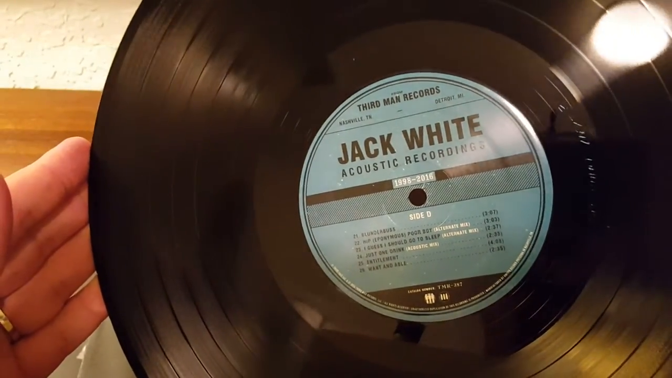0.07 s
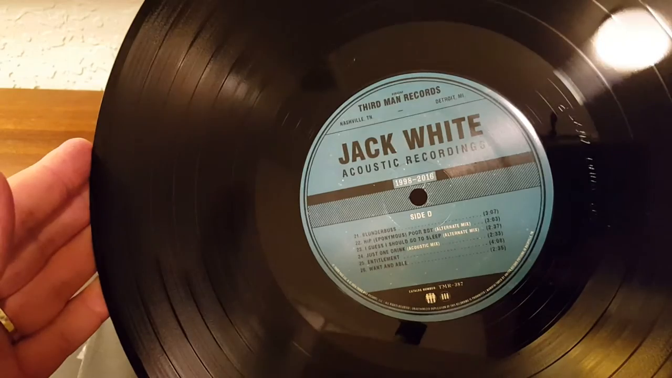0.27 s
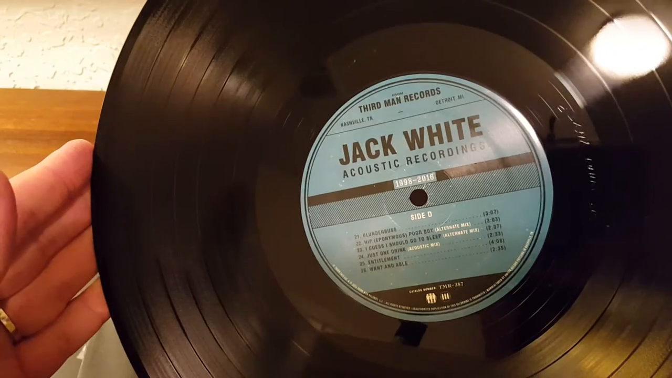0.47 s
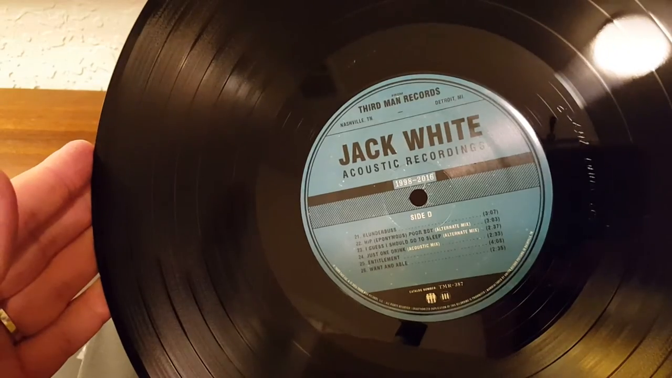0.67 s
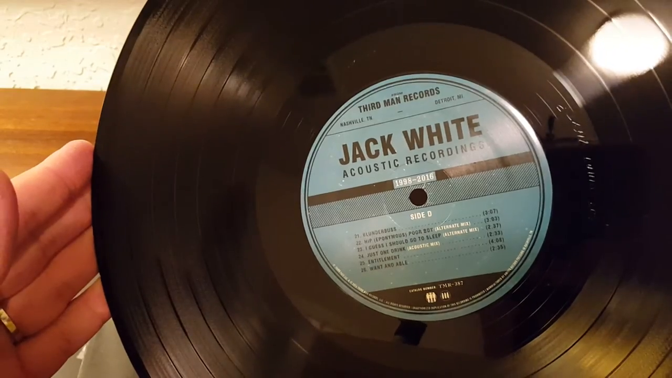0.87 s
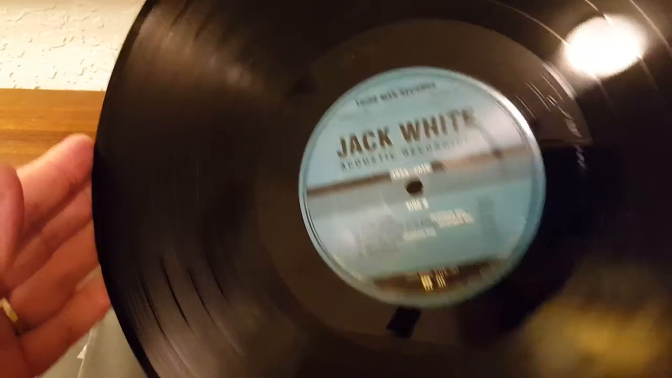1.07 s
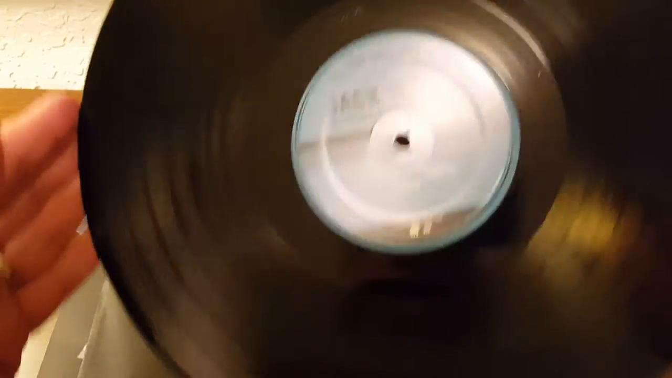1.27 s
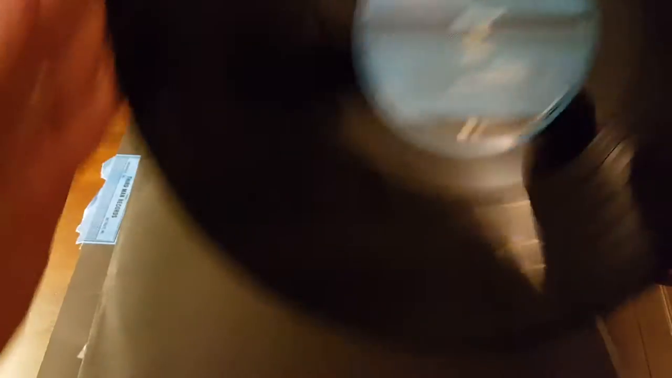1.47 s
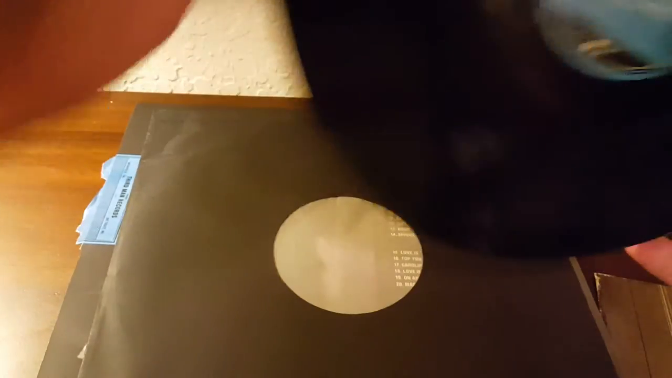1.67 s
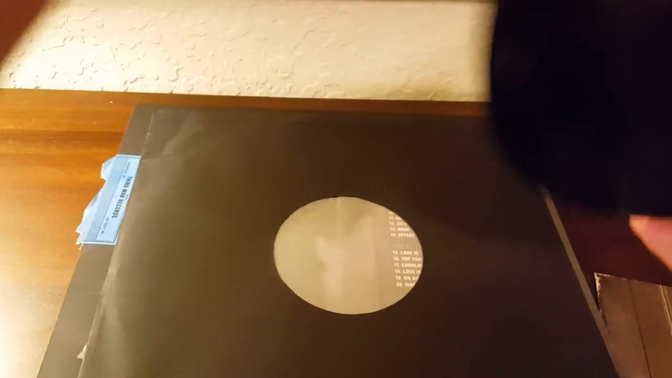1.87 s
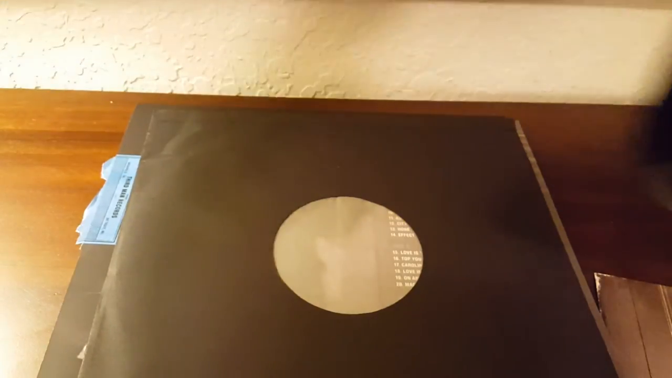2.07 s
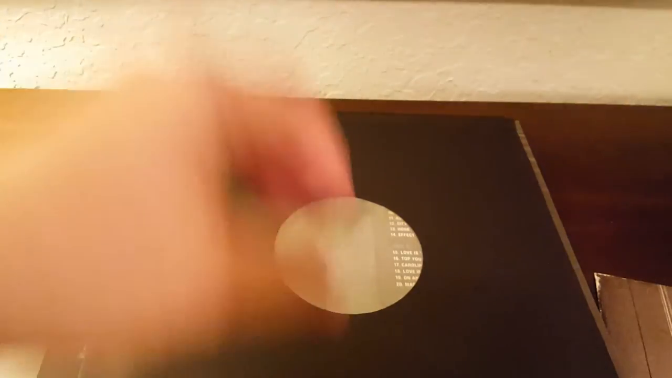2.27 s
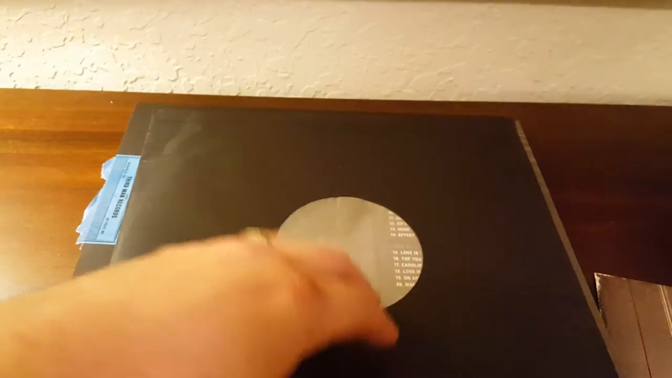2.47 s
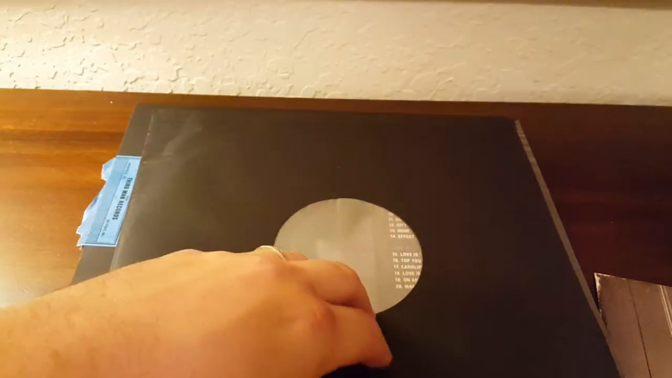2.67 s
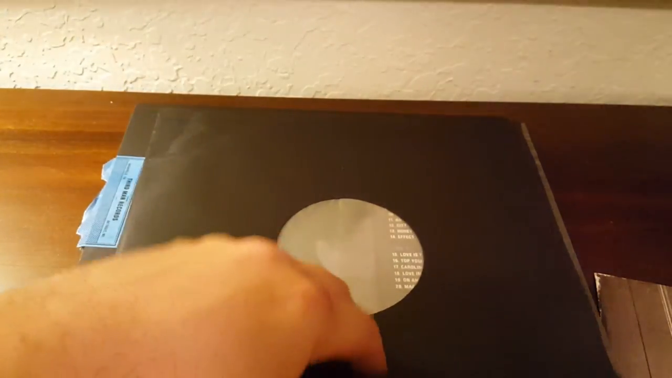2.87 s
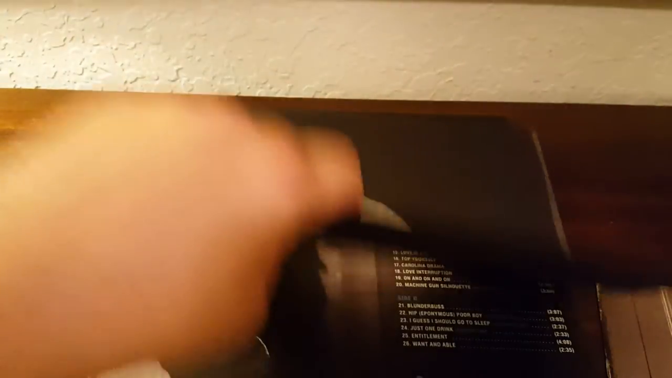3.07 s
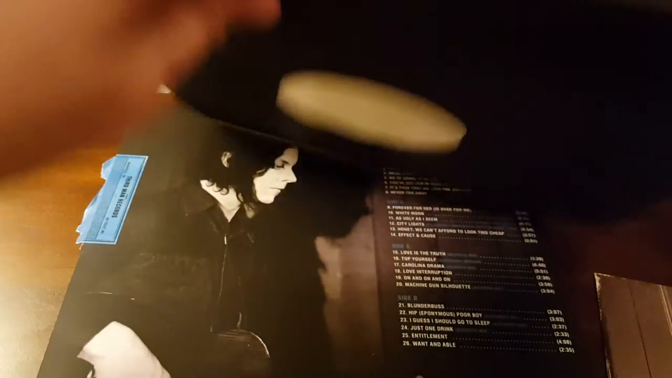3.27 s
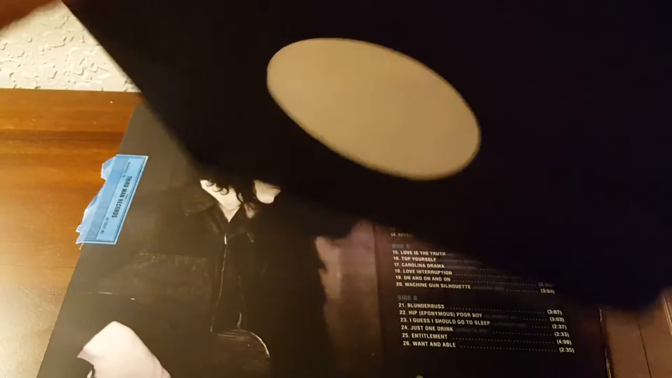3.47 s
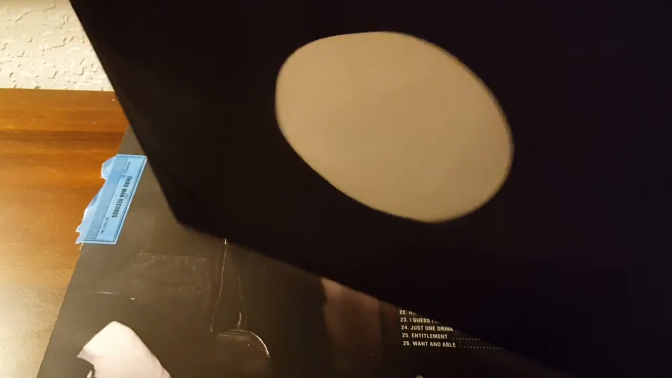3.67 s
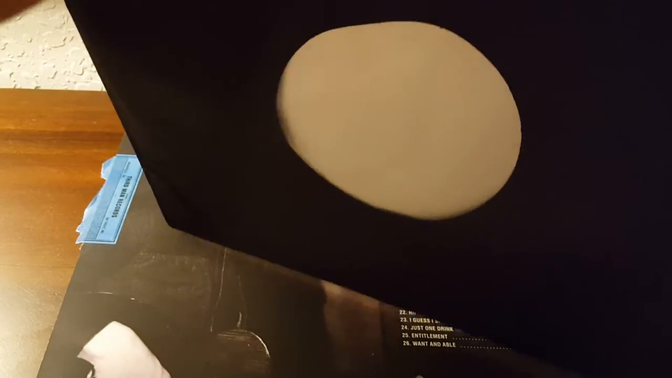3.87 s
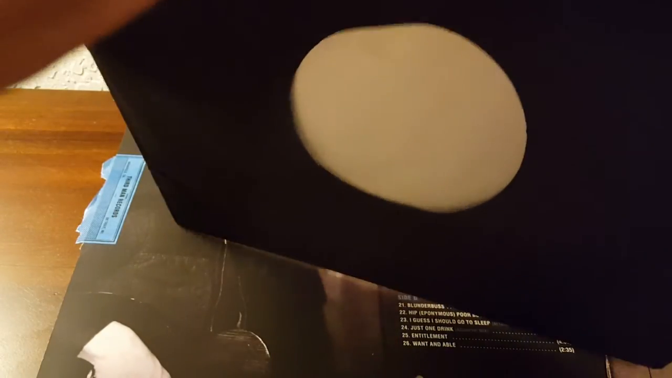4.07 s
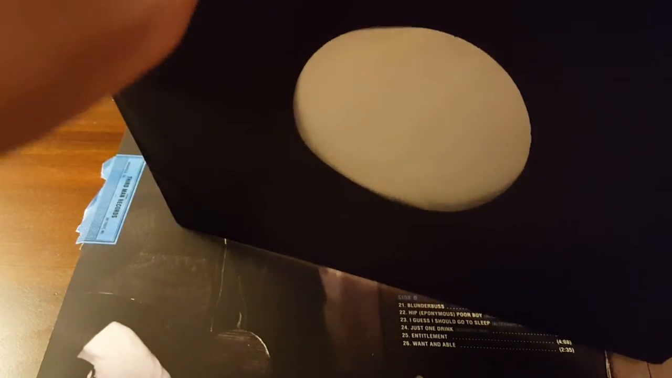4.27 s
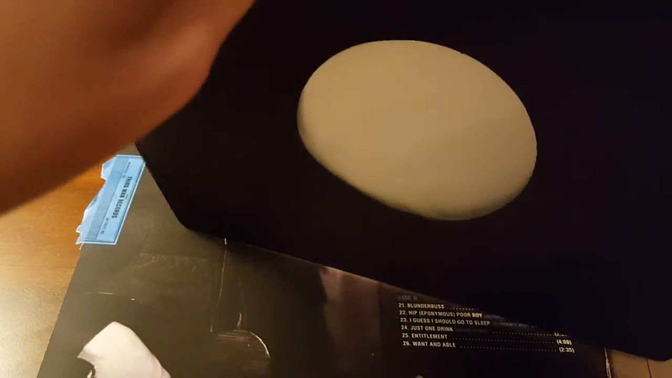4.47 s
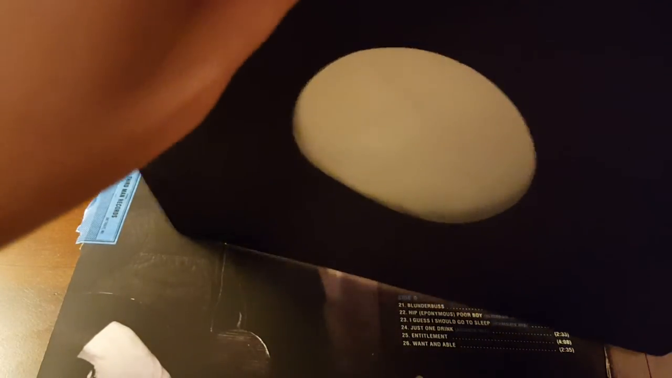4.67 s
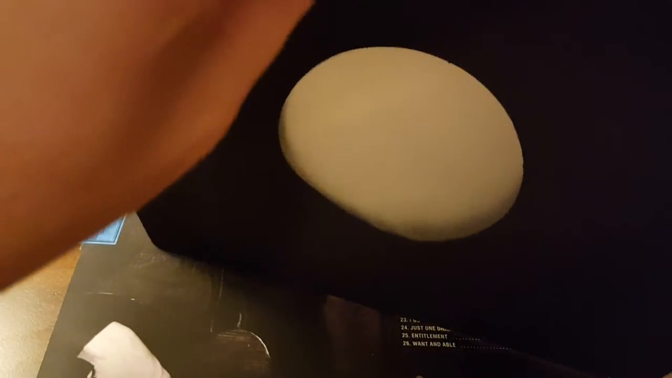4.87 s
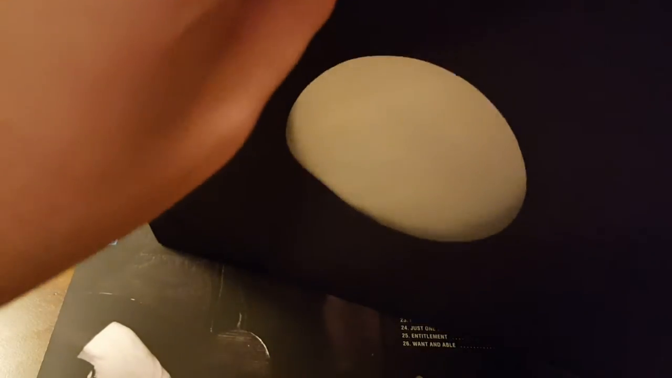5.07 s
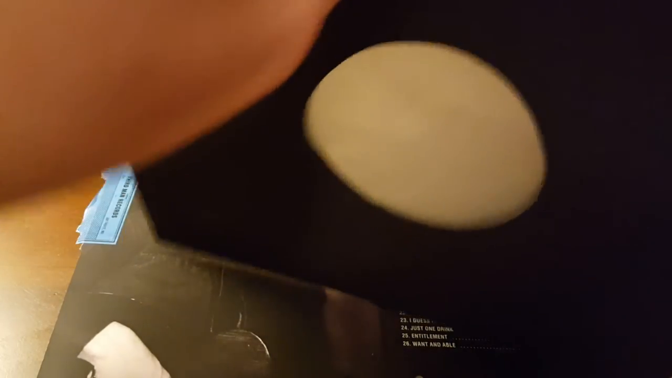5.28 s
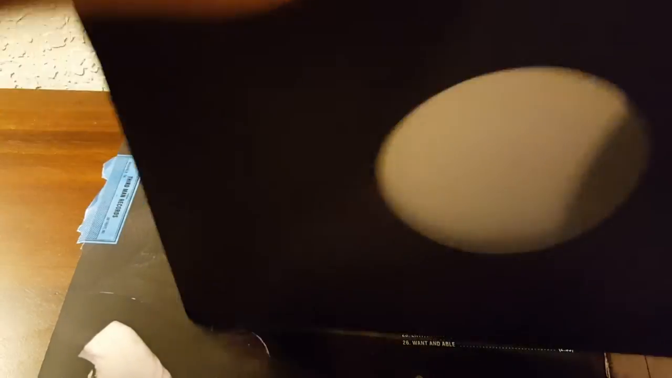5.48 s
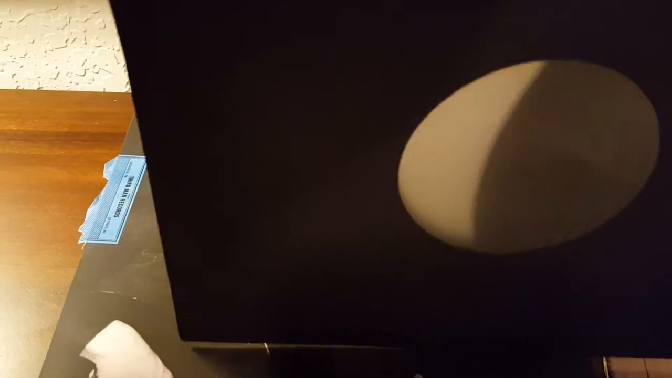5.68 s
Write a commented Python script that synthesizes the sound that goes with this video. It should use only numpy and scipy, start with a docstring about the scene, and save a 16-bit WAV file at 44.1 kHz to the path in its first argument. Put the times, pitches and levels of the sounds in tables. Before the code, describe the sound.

Fingers rub a vinyl record, it is set down with a hollow knock, then a paper sleeve slides, rustles and flaps open.

```python
"""Over the faint hum of a small room, fingers turn a vinyl record, rubbing softly on its face and rim.
It is set down with one hollow knock as the modes of a wooden top ring out. Next a paper inner sleeve is
pulled off its cardboard jacket: friction makes it rub and hiss, creases tick and a fingertip judders.
The sleeve is spread open, buckling, slapping and squeezing air from between its sheets.
At last it swishes and flaps close to the microphone."""
import sys
import numpy as np
from scipy import signal
from scipy.fft import rfft, irfft, next_fast_len
from scipy.io import wavfile
from scipy.ndimage import uniform_filter1d, map_coordinates

SR = 44100
rng = np.random.default_rng(int(sys.argv[2]) if len(sys.argv) > 2 else 0)


def inscribe(sig):
    """Save sig as 16-bit PCM at rate SR to the path in sys.argv[1].

    A 1-D sig is mono; a 2-D sig holds one channel per row.
    Samples are clipped to [-1, 1] before scaling.
    """
    pcm = np.round(np.clip(np.atleast_2d(sig).T, -1, 1) * 32767)
    wavfile.write(sys.argv[1], SR, pcm.astype(np.int16))


N = 251811

# steady hum and whine: (frequency [Hz], level [dB])
HUM_TONES = [(119, -80), (8624, -96)]
# reverberation of the room: (frequency [Hz], t60 [s])
ROOM_DECAY = [(100, 0.53), (300, 0.41), (800, 0.3), (2000, 0.18), (6000, 0.23), (15000, 0.33)]
# hands shifting on the disc: (time [s], level [dB])
GRIP_LEVELS = [(1.22, -93), (1.31, -68.5), (1.46, -67.5), (1.5, -63.5), (1.9, -65.5), (2.02, -69.5),
               (2.12, -63.5), (2.2, -79)]
# fingertips brushing its rim: (peak time [s], time to fade 20 dB [s], level [dB])
RIM_BRUSHES = [(1.375, 0.099, -71.5), (1.78, 0.06, -80), (1.91, 0.17, -78)]
# soft bumps of the disc and the bulging sheet: (time [s], relative level [dB], pitch [Hz])
PANEL_BUMPS = [(1.492, -47.5, 288), (1.587, -47, 290), (1.902, -43, 107.6), (2.57, -46.5, 122),
               (2.911, -38.5, 460), (2.992, -38.5, 264), (3.224, -38.5, 290), (3.326, -42, 224),
               (3.419, -43, 272), (3.734, -42, 225), (3.777, -45, 170), (4.069, -40.5, 236),
               (4.386, -38.5, 189), (4.688, -40, 257), (4.794, -29.5, 242.6), (5.353, -23.5, 267),
               (5.361, -21.5, 260), (5.393, -20.5, 244), (5.530, -28.5, 255), (5.579, -33, 157)]
# paper striking paper or fingers: (time [s], relative level [dB], t60 [s])
PAPER_SLAPS = [(1.694, -46, 0.05), (2.572, -46.5, 0.05), (2.783, -45, 0.044), (2.8594, -35.5, 0.051),
               (2.990, -36.5, 0.027), (3.1256, -29.5, .042), (3.451, -42, 0.031), (3.735, -35, 0.066),
               (3.742, -32.5, 0.072), (3.761, -34, 0.034), (4.1035, -35.5, 0.021), (4.386, -35.5, 0.059),
               (4.835, -36, .028), (4.904, -35, 0.14), (5.061, -41.5, 0.04), (5.363, -20, 0.026),
               (5.393, -21.5, 0.03), (5.457, -29.5, 0.034)]
# the disc touching down and settling: (time [s], relative level [dB])
DISC_CONTACTS = [(2.145, -29.5), (2.1492, -19), (2.168, -31), (2.1853, -29)]
# modes of the wooden top: (frequency [Hz], relative level [dB], t60 [s])
WOOD_MODES = [(86.7, -33, 0.6), (156.5, -12.5, 0.15), (212, -10.5, 0.16), (256.3, -12, 0.2),
              (288.3, -8.5, 0.18), (364, -18, 0.21), (440, -8, 0.17), (480.6, -3, 0.07),
              (521.4, -2.5, 0.085), (542.6, -6.5, 0.18), (663, -27, 0.25), (755, -12.5, 0.14),
              (976, -28.5, 0.2), (1100, -28, 0.15), (1145, -23.5, 0.16)]
# creases flipping over: (time [s], relative level [dB])
CREASE_SNAPS = [(2.5417, -54), (2.661, -49.5), (2.711, -52), (3.1734, -33.5), (3.8138, -49),
                (4.1045, -45.5), (4.124, -46), (4.364, -40.5), (4.4037, -39.5), (4.4787, -47.5),
                (4.641, -48), (4.772, -52), (4.8357, -42.5), (5.3937, -32), (5.4097, -41), (5.567, -27.5)]
# even pulls over the jacket: (start [s], length [s], rub level [dB], hiss over rub [dB])
SLEEVE_PULLS = [(2.556, 0.024, -64, 4), (2.713, 0.22, -69, 1), (2.862, 0.11, -56, 2.5),
                (2.983, 0.088, -51.5, 0.5), (3.072, 0.065, -54, -13), (3.125, 0.1, -46.5, -0.5),
                (3.235, 0.067, -50.5, -8.5), (3.34, 0.084, -68, 2), (3.531, 0.048, -64, -1)]
# air squeezed from between the sheets:
# (peak time [s], time to fade 20 dB [s], level [dB], resonance [Hz], glide [octaves/s], width [Hz])
AIR_PUFFS = [(3.19, 0.12, -46, 3386, -7.5, 1203), (3.746, 0.028, -43, 1452, -6, 370),
             (4.92, .045, -45, 1310, 2, 370), (4.943, 0.049, -42.5, 3600, 2, 990),
             (5.306, 0.048, -46, 2246, 17.5, 300), (5.334, 0.018, -41.5, 3320, 12.5, 370)]
# sheet scraping on sheet: (peak time [s], time to fade 20 dB [s], rub level [dB], hiss over rub [dB])
SHEET_SCRAPES = [(3.75, 0.05, -44, -12.5), (3.877, .1, -52, -13.5), (4.033, 0.13, -53, -12.5),
                 (4.128, 0.06, -55, -9), (4.185, .055, -49.5, -19), (4.246, 0.04, -59.5, -6),
                 (4.334, 0.03, -60.5, -9.5), (4.419, 0.06, -39.5, -12.5), (4.503, 0.13, -59, -13),
                 (4.569, .05, -50.5, -21), (4.666, 0.08, -53, -12), (4.737, 0.08, -48, -14),
                 (4.79, 0.1, -53, -21), (4.937, 0.0474, -31.5, -12.5), (5.088, 0.075, -48, -10),
                 (5.194, 0.15, -54, -12)]
# the open sleeve swinging past: (time [s], rub level [dB], hiss level [dB], flutter level [dB])
SWING_LEVELS = [(5.25, -79, -81.5, -92), (5.3, -52.5, -48.5, -62), (5.36, -44, -54.5, -38),
                (5.46, -48, -48.5, -46.5), (5.54, -52.5, -55, -50), (5.63, -62, -51.5, -57),
                (5.71, -57, -51, -55.5)]
# where the sleeve is: (time [s], left over right [dB], delay of the left channel [ms])
SLEEVE_PATH = [(2.5, -2, -0.086), (3.2, 0, 0.0039), (3.73, -1, 0.19), (5.4, -2.5, 0.2)]

# noise spectra: (frequency [Hz], relative spectral density [dB])
AIR_SPECTRUM = [(20, -7), (45, -8), (70, -11), (120, -3.5), (190, -14.5), (300, -13.5), (600, -17),
                (1200, -17), (2400, -24.5), (4500, -29.5), (8000, -35.5), (12000, -35), (15800, -34.5)]  # room air
SKIN_SPECTRUM = [(47, -28), (80, -1), (148, -8), (285, -1), (339, -5), (655, -13), (950, -18), (1110, -17),
                 (15000, -47.5)]  # skin on the disc
CRISP_SPECTRUM = [(300, -39.5), (1500, -1.5), (3500, -2.5), (7000, -3), (12000, -2), (16000, -5)]  # creases and rim brushes
SLAP_SPECTRUM = [(100, -1.5), (400, -5.5), (750, 8), (1050, -5.5), (1400, 4.5), (2200, -5), (4500, -10),
                 (9000, -22.5), (16000, -35.5)]  # clapping paper
THUD_SPECTRUM = [(30, -65), (70, -45), (130, -5.5), (260, -9), (520, -5), (750, -6.5), (1100, -12.5),
                 (1400, -19), (2300, -21), (3600, -32.5), (6000, -41.5), (16000, -61)]  # dense modes of the wood
CARD_SPECTRUM = [(150, -33), (400, -10), (650, -4), (1000, 0.5), (1800, 1.5), (2600, 3.5), (3500, -3),
                 (4600, -5), (8000, -25), (16000, -35)]  # paper on cardboard
HISS_SPECTRUM = [(1500, -19), (3500, -4.5), (6000, -3.5), (8500, -2.5), (10500, -7.5), (13000, -6),
                 (16000, -11)]  # fine sliding hiss
FLUTTER_SPECTRUM = [(25, -32), (60, -5), (100, 0), (200, -1.5), (270, 2), (345, -9.5), (445, -0.5),
                    (550, -9), (690, -3.5), (900, -11), (1500, -8), (5000, -58)]  # the buckling sheet
PAPER_SPECTRUM = [(150, -26), (540, -10.5), (690, 6), (1050, -1), (1500, 3.5), (2400, 4.5), (3600, -2.5),
                  (4600, -9), (8000, -15.5), (16000, -54)]  # paper on paper

HELD_FROM_S, HELD_TO_S = 3.3, 5.3  # the sleeve is held in the air


def amp(db):
    """Amplitude ratio of a level in decibels."""
    return 10 ** (np.asarray(db) / 20)


def unit(x):
    """Normalisation to an rms of 1."""
    return x / np.sqrt(np.mean(x ** 2) + 1e-20)


def clock():
    """Time of every sample, in seconds."""
    return np.arange(N) / SR


def along(points, hz):
    """Interpolation of (frequency, value) points on a logarithmic frequency axis."""
    freqs, values = np.transpose(points)
    return np.interp(np.log(hz + 1), np.log(freqs), values)


def curves(rows):
    """Linear interpolation in time: one curve for each column after the first."""
    times, *columns = np.transpose(rows)
    return [np.interp(clock(), times, column) for column in columns]


def add(track, start, sound):
    """Superposition: a sound adds to the track from its start time on."""
    part = track[..., round(start * SR):][..., :sound.shape[-1]]
    part += sound[..., :part.shape[-1]]


def decay(t, t60):
    """Exponential damping: the level falls 60 dB in t60 seconds."""
    return np.exp(-np.log(1000) * t / t60)


def during(start, end):
    """A rectangular gate, smoothed at its edges."""
    return uniform_filter1d(1.0 * ((clock() >= start) & (clock() <= end)), size=600)


def swell(peak, fade, rise_ratio=0.55, rounding=0.97):
    """Envelope of a stroke that speeds up and slows down; rounding 1 is pointed, 2 a bell."""
    t = clock() - peak
    return amp(-20 * (np.maximum(t, -t / rise_ratio) / fade) ** rounding)


def even_pull(start, length, attack_s=0.024, release_db_per_s=420):
    """Envelope of steady sliding: linear attack, plateau, exponential release."""
    t = clock() - start
    return np.clip(t / attack_s, 0, 1) * amp(-release_db_per_s * np.maximum(t - length, 0))


def wobble(rate):
    """Low-pass noise: a smooth curve through `rate` random knots a second."""
    knots = rng.standard_normal(int(N * rate / SR) + 4)
    return unit(map_coordinates(knots, [clock() * rate]))


def narrowband(hz, width):
    """Noise in one resonance: a carrier with randomly modulated quadrature parts."""
    phase = 2 * np.pi * np.cumsum(hz) / SR
    return unit(wobble(width) * np.sin(phase) + wobble(width) * np.cos(phase))


def stereo_noise(shared, size=N):
    """Partial coherence: white noise with a share of its power common to both channels."""
    common = np.sqrt(shared) * rng.standard_normal(size)
    return common + np.sqrt(1 - shared) * rng.standard_normal((2, size))


def diffuse(size, apart_hz):
    """A diffuse field: long waves reach both channels alike, those above apart_hz independently."""
    mid, side = rfft(rng.standard_normal((2, size)))
    angle = np.clip(np.fft.rfftfreq(size, 1 / SR) / apart_hz, 0, 1) * np.pi / 4
    return irfft(np.cos(angle) * mid + np.array([[1], [-1]]) * np.sin(angle) * side, size)


def burst(t60, shared):
    """A transient of exponentially damped stereo noise."""
    t = np.arange(SR // 3) / SR
    return stereo_noise(shared, size=len(t)) * decay(t, t60)


def stick_slip(rate, spread_db, shared):
    """Stick-slip as shot noise: tiny uneven impulses, on average `rate` a second."""
    catches = rng.random(N) < rate / SR
    impulses = stereo_noise(shared) * catches
    return unit(impulses * amp(spread_db * np.minimum(rng.exponential(size=N), 4)))


def coloured(x, spectrum, size=4096):
    """Minimum-phase filtering: a causal response of unit energy imposes the spectrum."""
    magnitude = amp(along(spectrum, np.fft.rfftfreq(size, 1 / SR)))
    cepstrum = irfft(np.log(magnitude))
    causal_fold = np.r_[1, np.full(size // 2 - 1, 2), np.zeros(size // 2)]
    response = irfft(np.exp(rfft(cepstrum * causal_fold)))
    return signal.fftconvolve(x, np.atleast_2d(response / np.linalg.norm(response)), axes=1)[:, :N]


def background():
    """Ambient noise: a diffuse field of room air under a hum and a thin electrical whine."""
    tones = sum(amp(db) * np.sqrt(2) * np.sin(2 * np.pi * hz * clock() + 0.5 * wobble(15))
                for hz, db in HUM_TONES)
    air = unit(coloured(diffuse(size=N, apart_hz=810), AIR_SPECTRUM))
    return amp(-66) * air + tones


def hands():
    """Skin friction: a dull rub on the face of the disc and a bright brushing on its rim."""
    level_db, = curves(GRIP_LEVELS)
    grip = during(GRIP_LEVELS[0][0], GRIP_LEVELS[-1][0]) * amp(level_db + 2.3 * wobble(22.07))
    skin = unit(coloured(stick_slip(rate=1000, spread_db=1.1, shared=0.79), SKIN_SPECTRUM))
    brush = unit(coloured(stereo_noise(shared=0.087), CRISP_SPECTRUM))
    rim_strokes = sum(amp(db) * swell(peak, fade) for peak, fade, db in RIM_BRUSHES)
    return grip * skin + (amp(-15.5) * grip + rim_strokes) * brush


def bumps(rise_cycles=0.6):
    """Panel radiation: the disc or a buckling sheet pushes the air in two heavily damped modes."""
    out, t = np.zeros((2, N)), np.arange(SR // 8) / SR
    for start, db, hz in PANEL_BUMPS:
        push = t * hz / rise_cycles
        upper_hz = hz * rng.uniform(1.2, 2.56)
        panel = np.sin(2 * np.pi * hz * t) + 0.43 * np.sin(2 * np.pi * upper_hz * t)
        add(out, start, amp(db - 6) * push * np.exp(1 - push) * panel)
    return out


def slaps(contact_s=0.00079):
    """Impact noise: the loose sheet claps on paper or fingers; finite contact time softens the onset."""
    out = np.zeros((2, N))
    for start, db, t60 in PAPER_SLAPS:
        clap = burst(t60, shared=0.49)
        onset = 1 - np.exp(-np.arange(clap.shape[1]) / SR / contact_s)
        add(out, start, amp(db - 5.5) * clap * onset)
    return coloured(out, SLAP_SPECTRUM)


def knock():
    """Modal vibration: struck by the disc, a wooden top rings in its low modes over a dense thud."""
    t = np.arange(SR // 2) / SR
    ring = sum(amp(db) * np.sin(2 * np.pi * hz * t) * decay(t, t60) for hz, db, t60 in WOOD_MODES)
    # the soft edge takes a moment to load the wood
    ring *= 1 - np.exp(-(t / 0.0007) ** 2)
    # a small top radiates no deep bass
    ring = signal.sosfilt(signal.butter(4, 72, "highpass", fs=SR, output="sos"), ring)
    # the dense upper modes build up as the blow spreads through the wood
    build = (1 - np.exp(-t / 0.008)) * decay(t, t60=0.3)
    top, thud = np.zeros((2, N)), np.zeros((2, N))
    for start, db in DISC_CONTACTS:
        add(top, start, amp(db) * ring)
        add(thud, start, amp(db - 19.5) * build * diffuse(size=len(t), apart_hz=600))
    return top + coloured(thud, THUD_SPECTRUM)


def snaps(ticks_per_s=12):
    """Snap-through buckling: creases flip with a dry tick, faint ones at random in the held sleeve."""
    out = np.zeros((2, N))
    count = int(ticks_per_s * (HELD_TO_S - HELD_FROM_S))
    faint = [(rng.uniform(HELD_FROM_S, HELD_TO_S), rng.normal(-55.5, 2.1)) for _ in range(count)]
    for start, db in CREASE_SNAPS + faint:
        add(out, start, amp(db - 3.5) * burst(t60=0.012, shared=0.35))
    return coloured(out, CRISP_SPECTRUM)


def shifting_resonances(x, depth_db):
    """Time-varying filtering: resonances come and go at random as a sheet changes shape."""
    spectra = signal.stft(x, nperseg=512)[2]
    patches = uniform_filter1d(rng.standard_normal(spectra.shape[1:]), size=5, axis=0)
    patches = uniform_filter1d(patches, size=7, axis=1)
    return unit(signal.istft(spectra * amp(depth_db * unit(patches)), nperseg=512)[1][:, :N])


def sliding(rub_gain, hiss_gain, surface, rate, spread_db, shared):
    """Sliding friction: paper fibres catch and let go, giving a grainy rub and a finer hiss."""
    grip_db = 1.35 * wobble(60)  # the contact catches and eases
    rub = coloured(stick_slip(rate, spread_db, shared), surface)
    rub = shifting_resonances(rub, depth_db=2.2)
    hiss = coloured(stick_slip(2 * rate, spread_db, shared / 2), HISS_SPECTRUM)
    hiss = shifting_resonances(hiss, depth_db=1.5)
    return amp(grip_db) * (rub_gain * rub + hiss_gain * hiss)


def flutter_gain(rub_gain, flutter_db, pivot_db=-50):
    """A power law: flutter grows with the rub, reaching flutter_db at a rub of pivot_db."""
    return amp(flutter_db) * (rub_gain / amp(pivot_db)) ** 0.45


def flutter(gain):
    """Local buckling: many small impulses merge into the low flutter of the sheet."""
    return gain * unit(coloured(stick_slip(rate=900, spread_db=1.5, shared=0.91), FLUTTER_SPECTRUM))


def pulling():
    """Friction of paper on cardboard: the sleeve leaves the jacket in even pulls, fluttering."""
    rub = sum(amp(db) * even_pull(start, length) for start, length, db, _ in SLEEVE_PULLS)
    hiss = sum(amp(db + hiss_db) * even_pull(start, length)
               for start, length, db, hiss_db in SLEEVE_PULLS)
    slide = sliding(rub, hiss, CARD_SPECTRUM, rate=9000, spread_db=2.5, shared=0.3)
    return slide + flutter(flutter_gain(rub, flutter_db=-60))


def judder(hz=536):
    """Frictional vibration: a fingertip judders over the jacket in one narrow band."""
    return amp(-54) * even_pull(start=2.99, length=0.21) * narrowband(np.full(N, hz), width=180)


def air_pocket():
    """Cavity resonance: the hiss of trapped air rises in pitch as the gap closes, falls as it opens."""
    out = np.zeros((2, N))
    for peak, fade, db, hz, glide, width in AIR_PUFFS:
        resonance_hz = hz * 2 ** (glide * np.clip(clock() - peak, -fade, fade))
        hiss = np.array([narrowband(resonance_hz, width) for _ in range(2)])
        out += amp(db) * swell(peak, fade) * hiss
    return out


def spreading():
    """Friction of paper on paper: the sheets scrape apart, then the open sleeve swings past."""
    rub = sum(amp(db) * swell(peak, fade) for peak, fade, db, _ in SHEET_SCRAPES)
    hiss = sum(amp(db + hiss_db) * swell(peak, fade) for peak, fade, db, hiss_db in SHEET_SCRAPES)
    swinging = during(SWING_LEVELS[0][0], N / SR)
    swing_rub, swing_hiss, swing_flutter = swinging * amp(curves(SWING_LEVELS))
    slide = sliding(rub + swing_rub, hiss + swing_hiss, PAPER_SPECTRUM,
                    rate=5000, spread_db=3.2, shared=0.45)
    stir = amp(-69) * during(HELD_FROM_S, HELD_TO_S)  # the held sheet is never quite still
    bending = np.maximum(flutter_gain(rub, flutter_db=-56.5), stir)
    return slide + flutter(bending + swing_flutter)


def placed(x):
    """Time and level cues: a source to the right reaches the left channel later and weaker."""
    balance_db, delay_ms = curves(SLEEVE_PATH)
    left = map_coordinates(x[0], [np.arange(N) - delay_ms * SR / 1000])
    return np.array([left, x[1]]) * amp(np.array([balance_db, -balance_db]) / 2)


def room(x, wet_db, predelay_samples=180):
    """Reverberation: near walls return a diffuse tail, each frequency decaying at its own rate."""
    hz, t, spectra = signal.stft(diffuse(size=SR // 2, apart_hz=1200), SR, nperseg=256)
    tail = signal.istft(spectra * decay(t, along(ROOM_DECAY, hz)[:, None]), SR, nperseg=256)[1]
    tail = np.pad(tail / np.linalg.norm(tail[0]), ((0, 0), (predelay_samples, 0)))
    return x + amp(wet_db) * signal.fftconvolve(x, tail, axes=1)[:, :N]


def scene():
    """Superposition: disc, sleeve and hands sound in the room over its steady background."""
    paper = placed(pulling() + spreading() + air_pocket() + slaps() + snaps() + judder() + bumps())
    disc = room(knock(), wet_db=-17)
    return disc + room(paper + hands(), wet_db=-10) + background()


def record(dry, low_cut_hz=62, top_hz=15950):
    """Band limiting: the microphone thins the deep bass, and nothing passes above top_hz."""
    size = next_fast_len(N + SR // 4)
    hz = np.fft.rfftfreq(size, 1 / SR)
    response = (hz < top_hz) * hz ** 2 / np.hypot(hz ** 2, low_cut_hz ** 2)
    return irfft(rfft(dry, size) * response, size)[..., :N]


dry = scene()
out = record(dry)
inscribe(out)
```